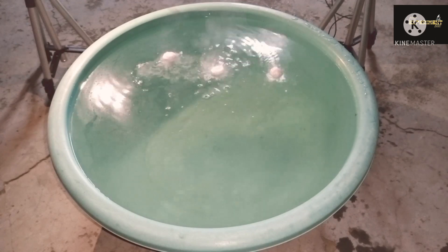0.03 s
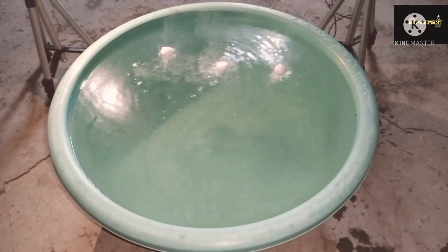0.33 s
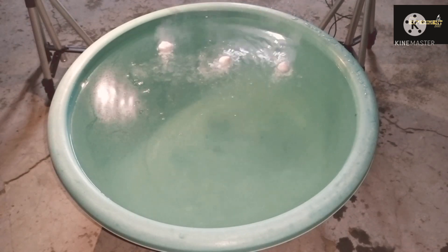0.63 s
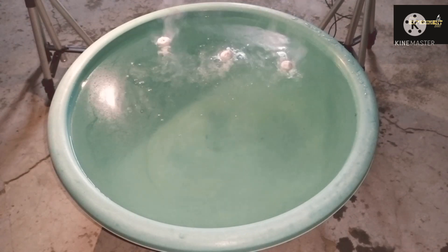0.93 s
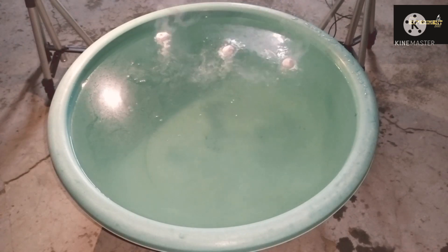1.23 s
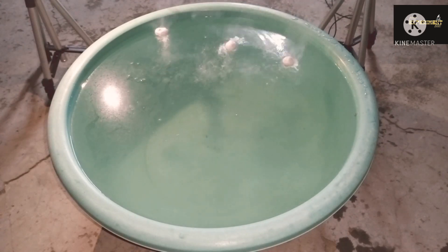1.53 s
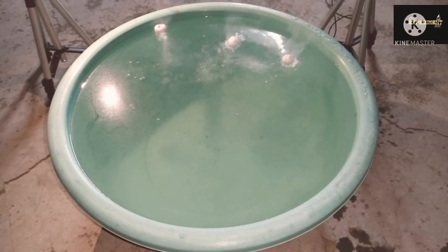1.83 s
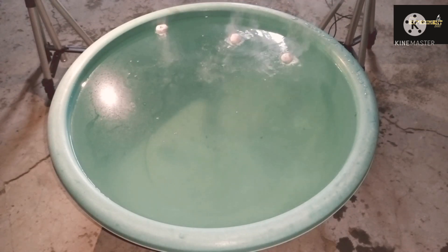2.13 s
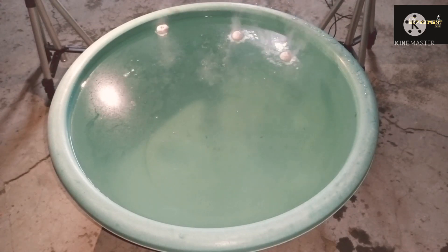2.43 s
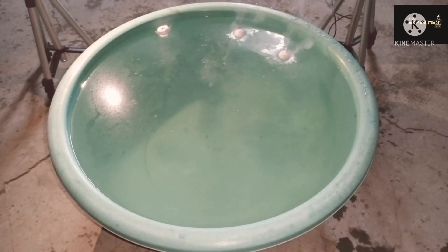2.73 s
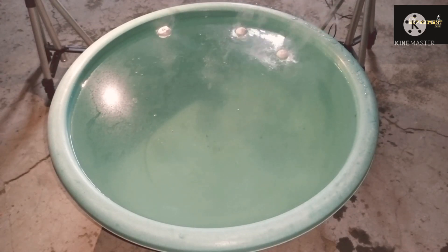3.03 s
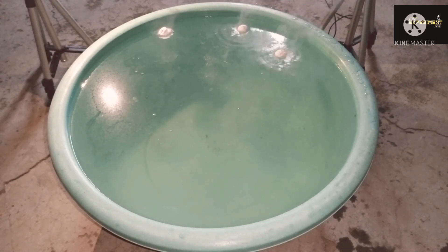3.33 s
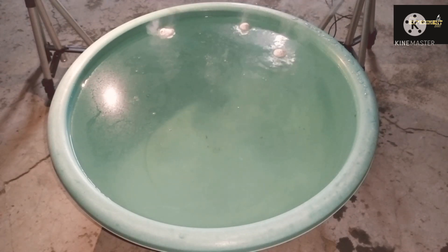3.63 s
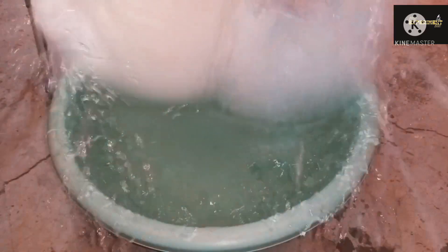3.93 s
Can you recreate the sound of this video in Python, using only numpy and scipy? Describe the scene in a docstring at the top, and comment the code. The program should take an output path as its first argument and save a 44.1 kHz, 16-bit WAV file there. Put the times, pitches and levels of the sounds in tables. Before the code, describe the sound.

Sodium lumps fizz and sputter steadily in a basin of water, close by outdoors. After one small pop, a sudden, very loud explosion overloads the microphone, followed by a rumbling echo and faint ticks of spray.

```python
"""A basin of water in a yard, heard from close by on one microphone over a low outdoor rumble.
Lumps of sodium skate on the water, burbling and fizzing as countless hydrogen bubbles burst.
Near 3 s one pocket of gas pops. Half a second later the hydrogen explodes: a crack and a roar that
overload the recorder, then a low boom and a rumbling echo from the surroundings.
Last come the first ticks of falling spray."""
import sys
import numpy as np
from scipy import signal
from scipy.fft import rfft, irfft
from scipy.io import wavfile

SR = 44100
rng = np.random.default_rng(int(sys.argv[2]) if len(sys.argv) > 2 else 0)


def inscribe(sig):
    """Save sig as 16-bit PCM at rate SR to the path in sys.argv[1].

    A 1-D sig is mono; a 2-D sig holds one channel per row.
    Samples are clipped to [-1, 1] before scaling.
    """
    pcm = np.round(np.clip(np.atleast_2d(sig).T, -1, 1) * 32767)
    wavfile.write(sys.argv[1], SR, pcm.astype(np.int16))


N = 176400
TIME = np.arange(N) / SR
BLAST_S = 3.5352

# vigour of the fizz, before each layer's trim (time [s], gurgle [dB], spit [dB], sputter [dB], hiss [dB])
VIGOUR = [(0, -48.7, -50.2, -44.9, -39.5), (0.12, -50.9, -50.5, -45.5, -40.2),
          (0.25, -51.2, -49.2, -45.0, -39.0), (0.31, -49.7, -48.9, -44.7, -40.2),
          (0.42, -49.4, -49.4, -44.3, -39.2), (0.6, -50.2, -48.4, -44.3, -41.0),
          (0.78, -50.4, -47.8, -44.5, -39.8), (0.95, -51.4, -46.5, -44.3, -40.2),
          (1.05, -52.7, -47.9, -44.8, -40.3), (1.25, -51.7, -49.2, -44.7, -41.0),
          (1.6, -52.2, -49.3, -42.4, -39.8), (1.9, -52.8, -48.5, -41.7, -38.7),
          (2.25, -53.7, -48.8, -41.7, -39.3), (2.5, -53.8, -48.5, -42.8, -40.2),
          (2.8, -53.9, -48.2, -43.6, -39.8), (3.05, -52.5, -46.7, -43.4, -39.1),
          (3.3, -52.5, -47.0, -43.1, -38.2), (3.48, -51.4, -46.8, -43.6, -38.6)]
# spectrum of the largest bubbles (frequency [Hz], level [dB])
GURGLE_COLOUR = [(30, -40), (80, -18), (160, -4), (240, -3), (300, -1.3), (420, -1), (560, 1), (700, -1),
                 (1000, -10), (2000, -26), (16000, -60)]
# spectrum of the middling bubbles (frequency [Hz], level [dB])
SPIT_COLOUR = [(200, -30), (600, -12), (780, -4.3), (920, -4.8), (1130, .3), (1300, -2), (1480, -4.5),
               (1700, -2.7), (2200, -10), (4000, -26), (16000, -50)]
# spectrum of the small bubbles (frequency [Hz], level [dB])
SPUTTER_COLOUR = [(500, -25), (1500, -8), (2100, -3.5), (2380, -.3), (2650, -2), (2900, .3), (3150, -.7),
                  (3850, 0), (4450, -8), (5300, -11), (7000, -15), (16000, -35)]
# spectrum of the finest bubbles and of fine spray (frequency [Hz], level [dB])
HISS_COLOUR = [(2000, -25), (5100, -12.5), (5600, -8.5), (6400, -6), (7400, -3), (8150, 0), (8650, 0),
               (9600, -5), (10400, -6.5), (11000, -9), (12700, -12.3), (14000, -11), (15400, -8)]
# spectrum of bubbles ringing near one note (frequency [Hz], level [dB])
RING_COLOUR = [(600, -45), (1040, -14), (1130, 0), (1180, -1), (1280, -14), (2200, -45)]
# spectrum of a low burble (frequency [Hz], level [dB])
BURBLE_COLOUR = [(60, -35), (120, -8), (155, 0), (200, -3), (260, -9), (320, -7), (500, -25), (2000, -50)]
# spectrum of the blast's bright crack (frequency [Hz], level [dB])
CRACK_COLOUR = [(100, -12), (1000, -3), (2000, -1.5), (3100, 1), (3900, -2.5), (4600, -8), (5800, -12),
                (7000, -7), (8200, -.3), (9000, -3), (10000, -10), (12500, -14), (15400, -11.5)]
# spectrum of the fireball's roar (frequency [Hz], level [dB])
ROAR_COLOUR = [(20, -22), (60, -12), (140, 1), (500, 0), (1100, 0), (1700, -1), (3500, -5), (5000, -21),
               (6500, -23), (8300, -18), (12000, -35), (16000, -38)]
# spectrum of its flare-up (frequency [Hz], level [dB])
FLARE_COLOUR = [(25, -12), (60, -7), (130, -6), (500, 0), (1000, 1), (1650, 1), (2200, -8), (3700, -10),
                (5000, -22), (8300, -19), (12000, -38)]
# spectrum of its closing boom (frequency [Hz], level [dB])
BOOM_COLOUR = [(20, -16), (60, -7), (150, 3), (260, 1), (600, -1), (1200, -4), (2200, -14), (5000, -32),
               (16000, -55)]
# spectrum of the yard's rumble after the blast (frequency [Hz], level [dB])
RUMBLE_COLOUR = [(25, -28), (55, -12), (90, 3), (150, 6), (260, 0), (600, -1), (1400, -4), (2500, -12),
                 (3600, -15.5), (5000, -28), (6500, -30), (8400, -25), (11000, -43), (15400, -48)]
# spectrum of the late echo from farther off (frequency [Hz], level [dB])
ECHO_COLOUR = [(25, -34), (60, -18), (100, -3), (150, 2), (250, 0), (600, -1.5), (1400, -4), (2500, -12.5),
               (3600, -16), (5000, -28), (6500, -31), (8400, -28), (11000, -45), (15400, -49)]
# thrown drops landing (time [s], pitch [Hz], level [dB])
DROPS = [(3.8205, 13500, -14.5), (3.9005, 9200, -17)]
# rise and fall of the outdoor background (time [s], level [dB])
BACKGROUND_LEVEL = [(0, -59), (.22, -63), (.34, -55), (.5, -56), (.65, -58), (1.1, -56), (1.5, -58),
                    (3.0, -57), (3.5, -56)]
# spectrum of the outdoor background (frequency [Hz], level [dB])
BACKGROUND_COLOUR = [(20, -46), (35, -31), (50, -17), (70, -5), (95, 0), (150, 0), (230, -7), (500, -20),
                     (2000, -40)]


def fizz():
    """Hydrogen bubbles of four sizes burst around the lumps, coming off together in uneven spurts."""
    gurgle_db, spit_db, sputter_db, hiss_db = in_time(VIGOUR)
    gurgle = from_db(gurgle_db + .8) * bursts(GURGLE_COLOUR, per_s=3000, spread_db=1.2)
    spit = from_db(spit_db + .6) * bursts(SPIT_COLOUR, per_s=4500, spread_db=2.0)
    sputter = from_db(sputter_db + .5) * bursts(SPUTTER_COLOUR, per_s=10000, spread_db=2.4)
    swell_db = .5 * drift(rate_hz=9)
    hiss = from_db(hiss_db + 2.2 + swell_db) * bursts(HISS_COLOUR, per_s=20000, spread_db=2.3)
    spurt_db = .62 * drift(rate_hz=70)
    after_blast_db = -1.5 * (TIME > BLAST_S)   # less is left fizzing
    return (gurgle + spit + sputter + hiss) * from_db(spurt_db + after_blast_db)


def ringing_bubbles(colour, middle_s, half_length_s, level_db):
    """Bubbles of like size ring near one pitch, swelling and fading."""
    swell = np.exp(-((TIME - middle_s) / half_length_s) ** 2)
    return from_db(level_db) * swell * bursts(colour, per_s=4500, spread_db=2.0)


def gas_pop(start_s=2.9847, hz=950, length_s=.0013, level_db=-20.3):
    """A pocket of gas ignites with a dry pop, little more than one cycle long."""
    age = TIME - start_s
    window = np.sin(np.pi * np.clip(age / length_s, 0, 1))
    return from_db(level_db) * window * np.sin(2 * np.pi * hz * age)


def shock_front(hz=1000, t60_s=.014, level_db=20):
    """The blast's first pressure wave reaches the microphone and rings briefly."""
    return from_db(level_db) * dying(BLAST_S, t60_s) * np.sin(2 * np.pi * hz * (TIME - BLAST_S))


def fireball():
    """The hydrogen explodes: a bright crack and a roar, a flare-up, a closing boom."""
    crack = surge(CRACK_COLOUR, delay_s=0, attack_s=.0004, hold_s=.074, fall_db_per_s=380, db=9)
    roar = surge(ROAR_COLOUR, delay_s=0, attack_s=.0006, hold_s=.03, fall_db_per_s=72, db=5.5)
    flare = surge(FLARE_COLOUR, delay_s=.055, attack_s=.025, hold_s=.012, fall_db_per_s=350, db=10.5)
    boom = surge(BOOM_COLOUR, delay_s=.088, attack_s=.02, hold_s=.006, fall_db_per_s=520, db=6)
    return crack + roar + flare + boom


def thump(middle_s=3.649, hz=135, half_length_s=.007, level_db=7):
    """The boom's deep pressure pulse closes the blast."""
    age = TIME - middle_s
    return from_db(level_db) * np.exp(-(age / half_length_s) ** 2) * np.sin(2 * np.pi * hz * age)


def falling_drops(t60_s=.009, bandwidth_hz=1300):
    """Thrown drops land with short, high ticks."""
    ticks = np.zeros(N)
    radius = np.exp(-np.pi * bandwidth_hz / SR)
    for start_s, hz, level_db in DROPS:
        resonance = [1, -2 * radius * np.cos(2 * np.pi * hz / SR), radius ** 2]
        splash = signal.lfilter([1, 0, -1], resonance, rng.standard_normal(N))
        ticks += from_db(level_db) * dying(start_s, t60_s) * unit_rms(splash)
    return ticks


def fine_spray(start_s=3.94, level_db=-34):
    """Finer spray patters back on the water."""
    return from_db(level_db) * (TIME > start_s) * bursts(HISS_COLOUR, per_s=900, spread_db=3.0)


def blast_echo():
    """The yard answers the blast with a rumble, then a late echo comes from farther off."""
    rumble = surge(RUMBLE_COLOUR, delay_s=.08, attack_s=.05, hold_s=.05, fall_db_per_s=60, db=-7.5)
    echo = surge(ECHO_COLOUR, delay_s=.235, attack_s=.055, hold_s=.07, fall_db_per_s=120, db=-5.5)
    return rumble + echo


def yard(direct, t60_s=.075, scatter_db=-12.5):
    """The microphone gets the direct sound and faint, short reflections off basin, ground and walls."""
    scatter = rng.standard_normal(N) * dying(0, t60_s)
    scatter /= np.linalg.norm(scatter)
    return direct + from_db(scatter_db) * signal.fftconvolve(direct, scatter)[:N]


def background():
    """Low outdoor rumble, far quieter than the basin."""
    level_db, = in_time(BACKGROUND_LEVEL)
    return from_db(level_db) * coloured(rng.standard_normal(N), BACKGROUND_COLOUR)


def bursts(colour, per_s, spread_db):
    """Tiny bursts at random, most small and a few large; rms 1."""
    sizes = from_db(spread_db * np.minimum(rng.exponential(1, N), 6))
    signs = rng.choice([-1, 1], N)
    bursting = rng.random(N) < per_s / SR
    return coloured(sizes * signs * bursting, colour)


def surge(colour, delay_s, attack_s, hold_s, fall_db_per_s, db):
    """Turbulent pressure that rises, holds and decays, starting delay_s after the blast begins."""
    age = TIME - BLAST_S - delay_s
    rise = np.clip(age / attack_s, 0, 1)
    fall_db = fall_db_per_s * np.maximum(age - attack_s - hold_s, 0)
    return rise * from_db(db - fall_db) * coloured(rng.standard_normal(N), colour)


def coloured(x, colour):
    """Give x a spectrum with a causal (minimum-phase) filter; rms 1."""
    hz, db = np.transpose(colour)
    bin_hz = np.maximum(np.arange(N // 2 + 1) * SR / N, 1)
    gain = from_db(np.interp(np.log(bin_hz), np.log(hz), db))
    cepstrum = irfft(np.log(gain), N)
    cepstrum[1:N // 2] *= 2   # fold onto positive time, so ringing follows each burst
    cepstrum[N // 2 + 1:] = 0
    return unit_rms(irfft(rfft(x) * np.exp(rfft(cepstrum)), N))


def drift(rate_hz):
    """Smooth random wander, mostly slower than rate_hz; rms 1."""
    bin_hz = np.arange(N // 2 + 1) * SR / N
    return unit_rms(irfft(rfft(rng.standard_normal(N)) / (1 + (bin_hz / rate_hz) ** 2), N))


def dying(start_s, t60_s):
    """Envelope that jumps to 1 at start_s and falls 60 dB in t60_s."""
    return (TIME >= start_s) * np.exp(-np.log(1000) * np.maximum(TIME - start_s, 0) / t60_s)


def in_time(rows):
    """Each level column of a timed table at every sample."""
    times, *columns = np.transpose(rows)
    return [np.interp(TIME, times, column) for column in columns]


def from_db(db):
    """Decibels to gain."""
    return 10 ** (np.asarray(db) / 20)


def unit_rms(x):
    """Scale to rms 1."""
    return x / np.sqrt(np.mean(x ** 2) + 1e-20)


def scene():
    """The basin and the yard around it, in mono at the microphone."""
    bubbles = fizz()
    bubbles += ringing_bubbles(RING_COLOUR, middle_s=.96, half_length_s=.17, level_db=-51)
    bubbles += ringing_bubbles(BURBLE_COLOUR, middle_s=.4, half_length_s=.13, level_db=-49.5)
    explosion = shock_front() + fireball() + thump() + blast_echo()
    spray = falling_drops() + fine_spray()
    return (yard(bubbles + gas_pop() + explosion + spray) + background())[None]


def record(dry):
    """The recorder's limiter ducks just ahead of the blast; the excess clips; the top treble is cut."""
    threshold_db, range_db = -8, 13
    look_ahead_s, attack_s, release_db_per_s = .024, .005, 8
    ceiling, hardness, cutoff_hz = .93, 4, 15550
    over_db = np.clip(20 * np.log10(np.abs(dry[0]) + 1e-9) - threshold_db, 0, range_db)
    release_db = release_db_per_s * TIME
    held_db = np.maximum.accumulate(over_db + release_db) - release_db
    ahead_db = np.interp(TIME + look_ahead_s, TIME, held_db)
    pole = np.exp(-1 / (attack_s * SR))
    duck_db = signal.lfilter([1 - pole], [1, -pole], ahead_db)
    limited = dry * from_db(-duck_db)
    clipped = limited / (1 + np.abs(limited / ceiling) ** hardness) ** (1 / hardness)
    lowpass = signal.firwin(401, cutoff_hz, fs=SR)
    return signal.fftconvolve(clipped, lowpass[None], "same")


dry = scene()
out = record(dry)
inscribe(out)
```